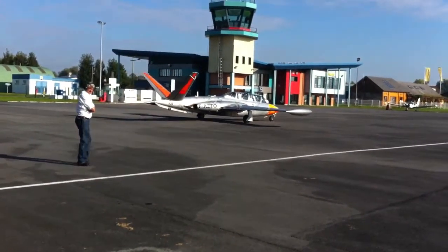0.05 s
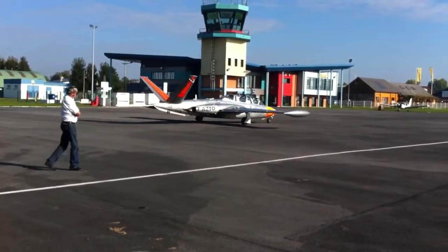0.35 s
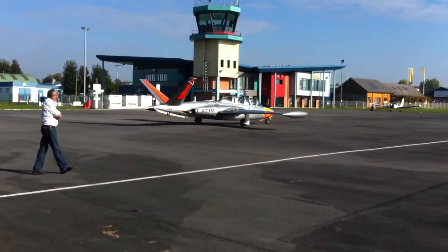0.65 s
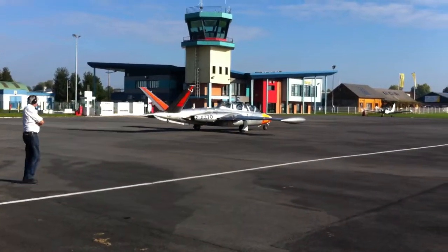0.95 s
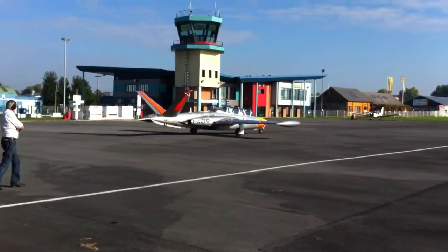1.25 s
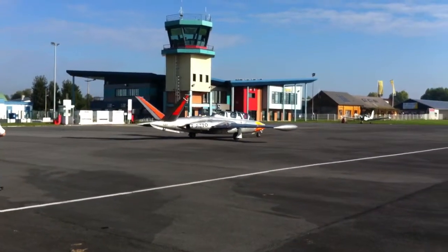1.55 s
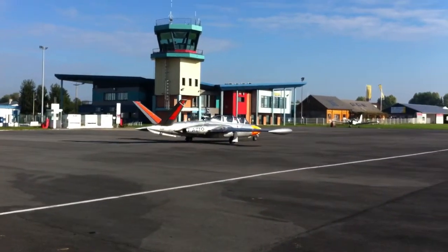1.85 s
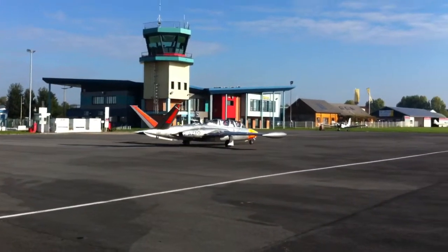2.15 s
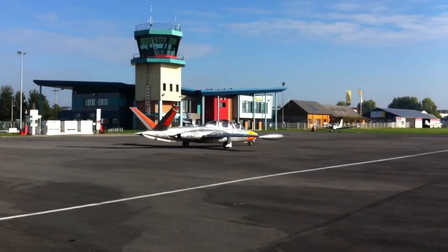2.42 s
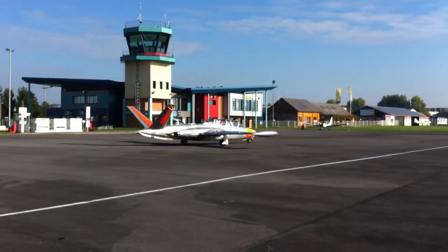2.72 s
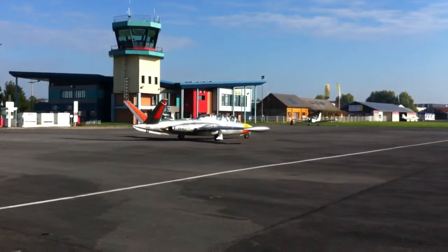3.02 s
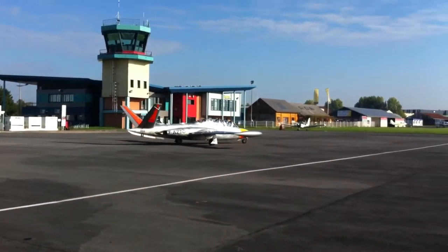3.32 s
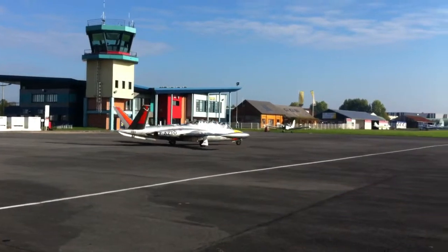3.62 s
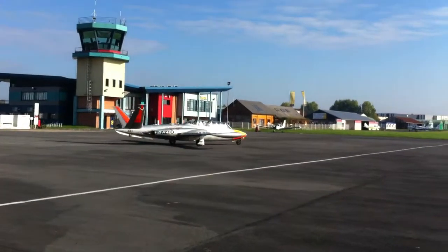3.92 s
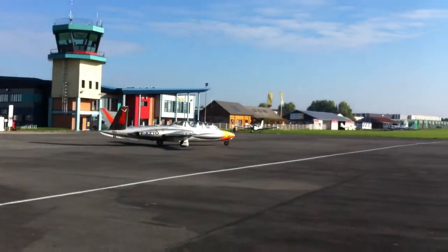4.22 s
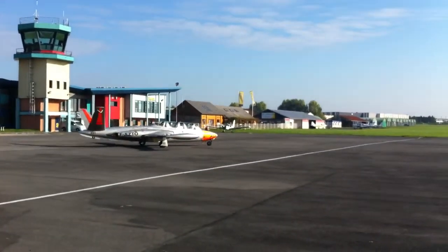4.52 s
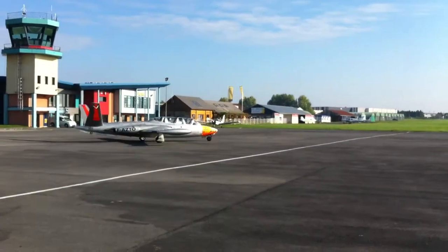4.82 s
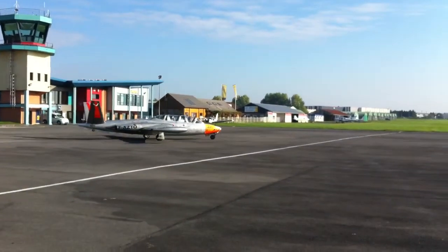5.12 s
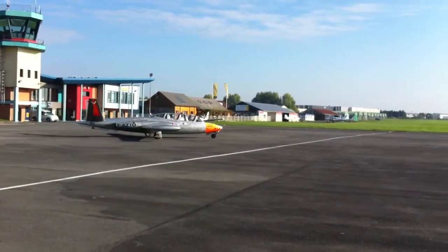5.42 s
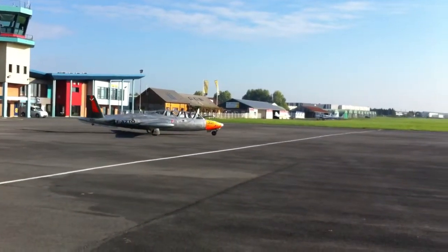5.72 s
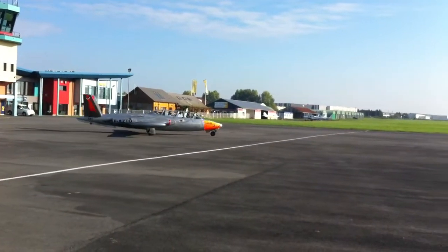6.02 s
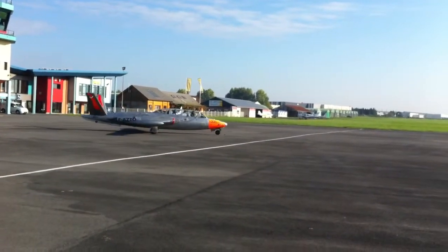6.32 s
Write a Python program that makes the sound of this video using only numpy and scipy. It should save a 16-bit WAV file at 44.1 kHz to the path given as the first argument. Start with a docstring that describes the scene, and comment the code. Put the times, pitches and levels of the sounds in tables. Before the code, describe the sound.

Two jet engines whine and rush on an airfield apron; the low roar eases and the whine drops while the hiss brightens.

```python
"""A small twin-engined jet taxis on an apron, turning steadily in front of one fixed microphone.
At first it is heard from the rear quarter: exhaust roar, and two compressors whining and beating.
From 3.5 s the pitch sinks as the throttles come back, the far engine lagging. The roar fades as the
jet comes side-on at about 4 s; then intake hiss and turbine tone grow as the nose swings nearer.
Throughout, the tarmac and the terminal front reflect the sound."""
import sys
import numpy as np
from scipy import signal
from scipy.fft import rfft, irfft, next_fast_len
from scipy.io import wavfile
from scipy.ndimage import map_coordinates

SR = 44100
rng = np.random.default_rng(int(sys.argv[2]) if len(sys.argv) > 2 else 0)


def file_out(sig):
    """Save sig as 16-bit WAV at sys.argv[1]."""
    # one column per channel
    cols = np.atleast_2d(sig).T
    # limit, then scale
    lim = np.clip(cols, -1, 1)
    pcm = np.round(lim * 32767).astype(np.int16)
    wavfile.write(sys.argv[1], SR, pcm)


N = 280456
TIME = np.arange(N) / SR
START_DEG, TURN_DEG_PER_S = 130, 9.5
OFF_NOSE_DEG = START_DEG - TURN_DEG_PER_S * TIME  # bearing of the microphone; 180 is tail-on


def undb(db):
    """Decibels to gain."""
    return 10 ** (np.asarray(db) / 20)


def unit(x):
    """Scale to rms 1."""
    return x / np.sqrt(np.mean(np.abs(x) ** 2))


def curve(table, lag_s=0):
    """A table of (t/s, value) joined by straight lines, read lag_s late."""
    return np.interp(TIME - lag_s, *np.transpose(table))


def delayed(x, seconds):
    """The sound heard later, by a lag that may move."""
    return map_coordinates(x, [(TIME - seconds) * SR], order=3, mode="mirror")


def walk(rate_hz):
    """Smooth random motion of spread 1, up to about the given rate."""
    size = next_fast_len(N)
    f = np.fft.rfftfreq(size, 1 / SR)
    white = rfft(rng.standard_normal(size))
    return unit(irfft(white / (1 + (f / rate_hz) ** 2), size)[:N])


def noise(spectrum, dips=()):
    """Noise of rms 1 shaped by a relative spectrum, rolled off at both ends and cut by any dips."""
    size = next_fast_len(N)
    f = np.maximum(np.fft.rfftfreq(size, 1 / SR), 1)
    hz, db = np.transpose(spectrum)
    roll_off = np.minimum(f / hz[0], 1) ** 3 * np.minimum(hz[-1] / f, 1) ** 4
    shape_db = np.interp(np.log(f), np.log(hz), db)
    for centre, width, depth_db in dips:
        shape_db += depth_db / (1 + (2 * (f - centre) / width) ** 2)
    white = rfft(rng.standard_normal(size))
    return unit(irfft(white * undb(shape_db) * roll_off, size)[:N])


def ahead(edge_deg, soft_deg):
    """Rises from 0 to 1 as the microphone enters a cone round the nose."""
    return .5 + .5 * np.tanh((edge_deg - OFF_NOSE_DEG) / soft_deg)


def lobe(centre_deg, width_deg):
    """Rises to 1 and falls again as a sideways beam sweeps over the microphone."""
    return np.exp(-((OFF_NOSE_DEG - centre_deg) / width_deg) ** 2)


def tarmac(spectrum, sink=.03):
    """Noise heard directly and off the ground; band and dips sink as the jet comes round and nearer."""
    # where the ground bounce cancels the direct sound: f/Hz, width/Hz, depth/dB
    dips = [(3270, 140, -11), (5600, 170, -19), (7770, 140, -17), (10050, 160, -7), (12950, 260, -20)]
    pitch_ratio = 1 - sink * ahead(edge_deg=89, soft_deg=9)
    lag_s = TIME - np.cumsum(pitch_ratio) / SR
    return unit(delayed(noise(spectrum, dips), lag_s))


def airflow():
    """Air rushes over the compressor blades; ducts, hiss and intakes swell as the nose comes round."""
    # compressor noise round the blade tone: f/Hz, level/dB
    blade_spectrum = [(2500, -8), (3050, -7.5), (3550, -1), (4300, -2), (4650, -2), (5100, -5), (5600, -45),
                      (7000, -45)]
    # rush of air in the intake ducts: f/Hz, level/dB
    duct_spectrum = [(1000, -46), (1300, 1), (1650, -1.5), (2100, 3.5), (2280, -21), (2450, -17)]
    # broad hiss of the compressors: f/Hz, level/dB
    hiss_spectrum = [(4200, -23), (5200, 4), (5900, 3.5), (6350, 6), (6750, 1.5), (7300, 0), (8300, 3),
                     (9600, 10.5), (10800, 6.5), (11600, 3.5), (12400, -7), (13600, -2), (14600, -9.5),
                     (15700, -14)]
    # sharp band that beams out of the intakes: f/Hz, level/dB
    intake_spectrum = [(6000, -18), (7300, -1.5), (7900, 0), (8400, 5), (8900, 5), (9500, -22),
                       (10200, -48), (12000, -13.5)]
    lips = lobe(centre_deg=81, width_deg=9.3)
    mouth = ahead(edge_deg=83, soft_deg=6)
    blades = tarmac(blade_spectrum) * undb(-26.8)
    duct = noise(duct_spectrum) * undb(-29.5 + 5.5 * lips)
    hiss = tarmac(hiss_spectrum) * undb(-29 + 4 * lips)
    intake = tarmac(intake_spectrum) * undb(-35 + 12 * mouth)
    flutter = undb(1.03 * walk(13.5))
    return duct + (blades + hiss + intake) * flutter


def exhaust():
    """Roar and pipe ring beam backwards; the mixing jets rush all round, a little louder side-on."""
    # low roar of the exhaust: f/Hz, level/dB
    roar_spectrum = [(20, -42), (55, -45), (80, -28), (100, -23), (125, -12.5), (160, -4), (205, 0.5),
                     (260, 0), (330, -3.5), (430, -20), (600, -36)]
    # hollow ring of the jet pipes: f/Hz, level/dB
    pipe_spectrum = [(1950, -23), (2170, 5), (2400, -18)]
    # rush of the mixing jets: f/Hz, level/dB
    rush_spectrum = [(200, -36), (280, -9), (345, -6), (430, -10.5), (570, 1), (730, 1.5), (850, -3),
                     (1030, -12), (1220, -6), (1480, -19), (1750, -10.5), (1950, -30), (2190, -14),
                     (2430, -19), (2750, -19.5), (3300, -37)]
    shade = ahead(edge_deg=97, soft_deg=4.5)
    abeam = lobe(centre_deg=89, width_deg=24)
    roar = noise(roar_spectrum) * undb(-17.5 - 6 * shade + .53 * walk(6))
    pipe = noise(pipe_spectrum) * undb(-33 - 4 * shade)
    rush = noise(rush_spectrum) * undb(-18.5 + 1.16 * abeam + walk(12))
    return roar + pipe + rush


def shimmer(slow_db, fast_db, slow_hz=5, fast_hz=45):
    """Gain of a tone that swells and flutters on its way through hot, moving air."""
    return unit(undb(slow_db * walk(slow_hz) + fast_db * walk(fast_hz)))


def scattered(phase, width_hz):
    """A tone spread by turbulence into a narrow band round its pitch."""
    return (walk(width_hz) * np.sin(phase) + walk(width_hz) * np.cos(phase)) / np.sqrt(2)


def engine(blade_hz, upper_db, wander_hz=3.54, turbine_ratio=2.312):
    """One shaft: a blade tone, with overtones, turbine tone and turbulent skirt each on its own beam."""
    octave_gain = undb(-10 - 3 * ahead(edge_deg=93, soft_deg=2.5))
    turbine_gain = undb(-24 + 23 * ahead(edge_deg=90, soft_deg=8.9))
    third_gain = undb(-41 + 26 * ahead(edge_deg=84, soft_deg=6.3))
    scatter_gain = undb(-16 + 14 * lobe(centre_deg=103, width_deg=19))
    hz = blade_hz + wander_hz * walk(9.34)
    phase = 2 * np.pi * np.cumsum(hz) / SR + rng.uniform(0, 2 * np.pi)
    blade = np.sin(phase) * shimmer(slow_db=1.3, fast_db=1.9, slow_hz=8)
    # small eddies in the exhaust spread part of the tone widely in pitch; large ones fray it close by
    skirt = scattered(phase, width_hz=150) + undb(-4) * scattered(phase, width_hz=30)
    octave = np.sin(2 * phase) * shimmer(slow_db=3, fast_db=2.5, slow_hz=3)
    octave += scatter_gain * scattered(2 * phase, width_hz=60)
    jitter_rad = .33 * walk(70)
    turbine = np.sin(turbine_ratio * phase + jitter_rad) * shimmer(slow_db=1.5, fast_db=2.2)
    third = np.sin(3 * phase) * shimmer(slow_db=2, fast_db=2.5)
    upper = octave_gain * octave + turbine_gain * turbine + third_gain * third
    return (blade + scatter_gain * skirt + undb(upper_db) * upper) / np.hypot(1, scatter_gain)


def whine(far_offset_hz=24, far_lag_s=.19, echo_s=.25, echo_db=-10):
    """Two engines at almost the same pitch beat together; the terminal front returns an earlier pitch."""
    # blade-passing tone of the engine nearer the microphone: t/s, f/Hz
    blade_pitch = [(-.25, 4019), (.8, 4112), (1.8, 4158), (3.52, 4181), (4.4, 4043), (5.1, 3918),
                   (5.6, 3858), (6.05, 3813), (6.36, 3738)]
    # the whine at the microphone: t/s, level/dB
    whine_level = [(0, -17), (1.0, -16), (1.5, -20), (2.8, -18.5), (3.3, -18.5), (4.2, -17), (5.3, -19.5),
                   (5.55, -22.5), (6.1, -23.5), (6.3, -18)]
    near = engine(curve(blade_pitch), upper_db=0)
    far = engine(curve(blade_pitch, far_lag_s) + far_offset_hz, upper_db=-8)
    # the far engine comes out from behind the fuselage
    far_gain = undb(-8 + 9.5 * ahead(edge_deg=122, soft_deg=15))
    pair = (near + far_gain * far) / np.hypot(1, far_gain)
    echo = undb(echo_db) * delayed(pair, echo_s)
    return unit(pair + echo) * undb(curve(whine_level))


def scene():
    """Whine, exhaust and airflow at one microphone on the apron."""
    return (whine() + exhaust() + airflow())[None]


def record(dry, ceiling=1.05, top_hz=15600):
    """The recorder rounds the highest peaks and cuts the top of the treble."""
    rounded = ceiling * np.tanh(dry / ceiling)
    top_cut = signal.ellip(10, .2, 80, top_hz, fs=SR, output="sos")
    return signal.sosfilt(top_cut, rounded)


dry = scene()
out = record(dry)
file_out(out)
```